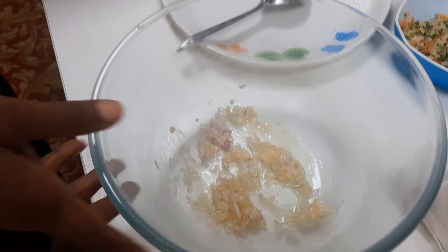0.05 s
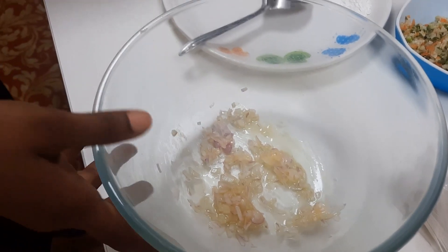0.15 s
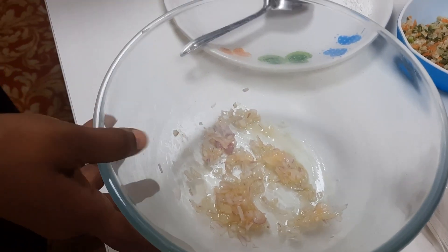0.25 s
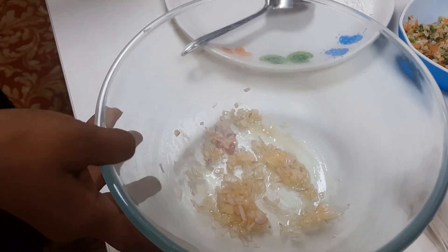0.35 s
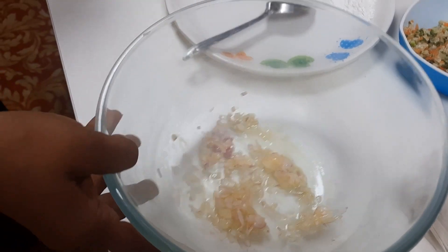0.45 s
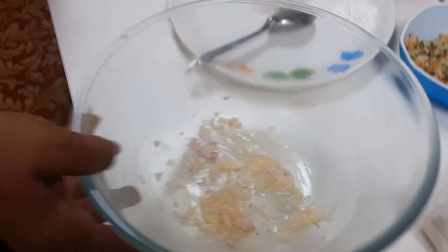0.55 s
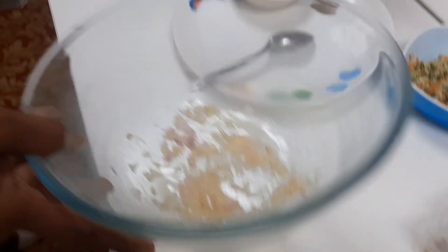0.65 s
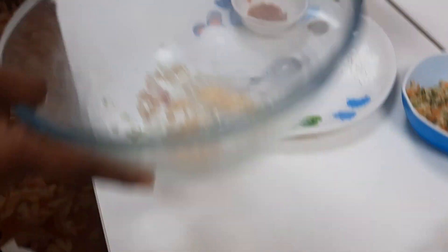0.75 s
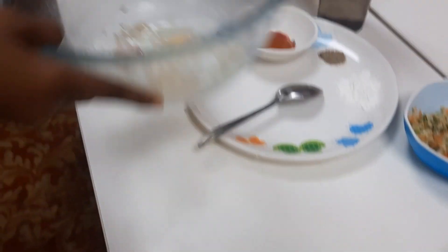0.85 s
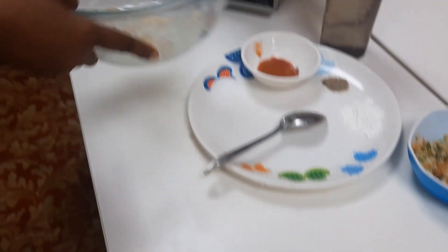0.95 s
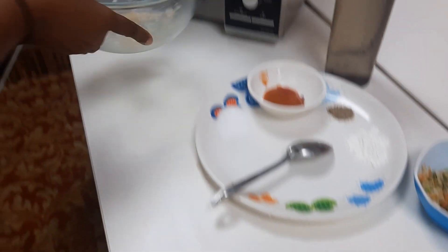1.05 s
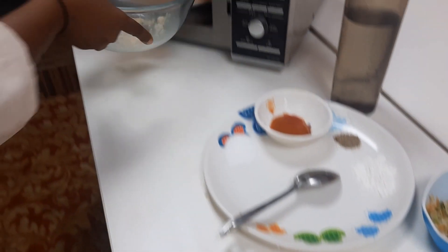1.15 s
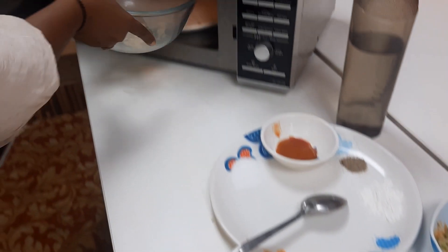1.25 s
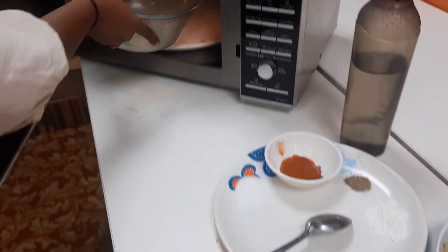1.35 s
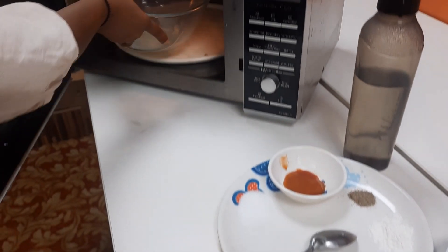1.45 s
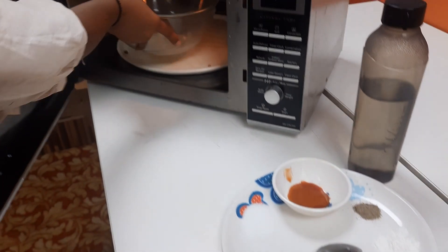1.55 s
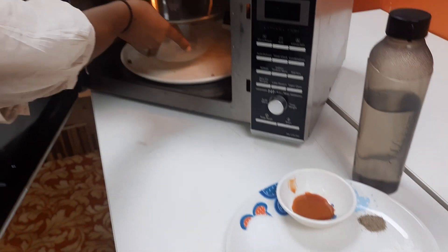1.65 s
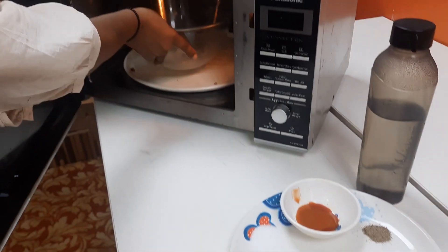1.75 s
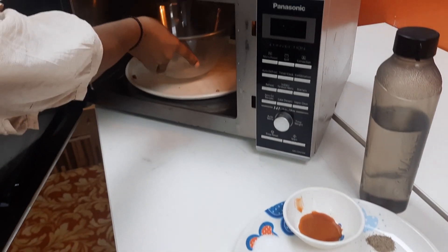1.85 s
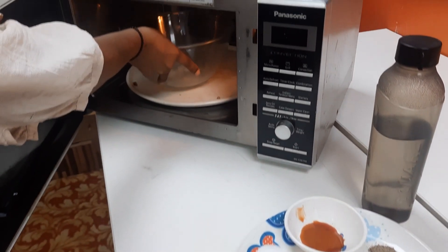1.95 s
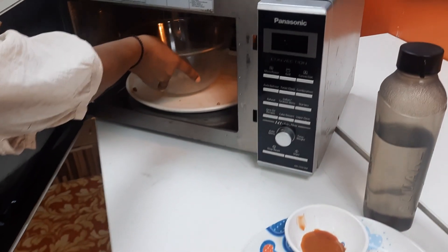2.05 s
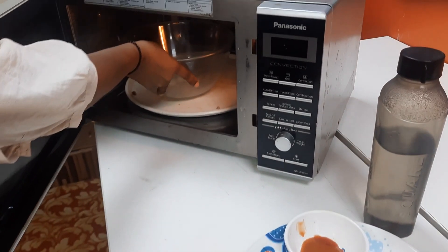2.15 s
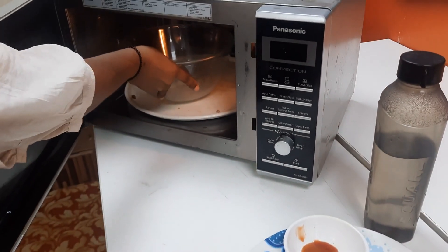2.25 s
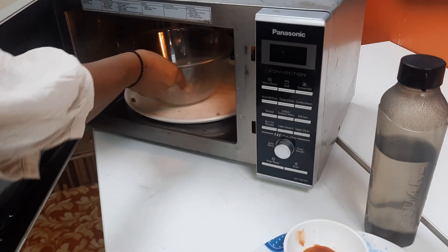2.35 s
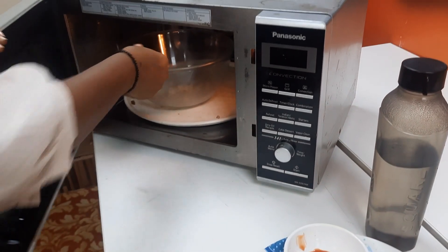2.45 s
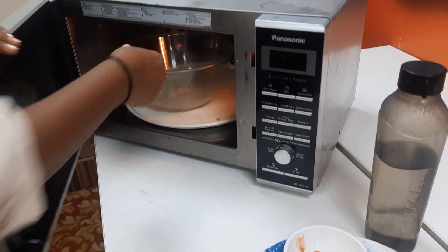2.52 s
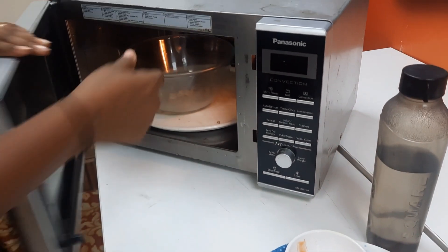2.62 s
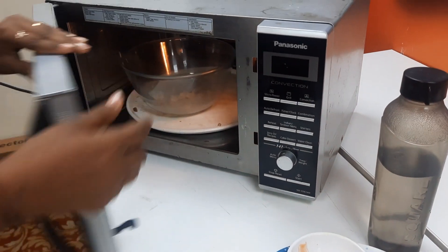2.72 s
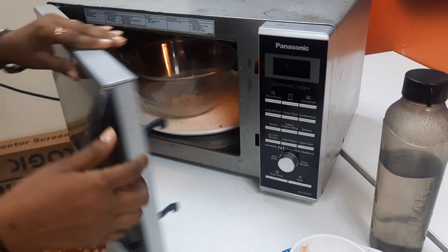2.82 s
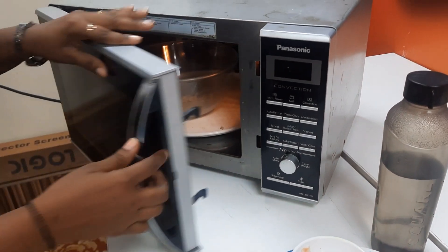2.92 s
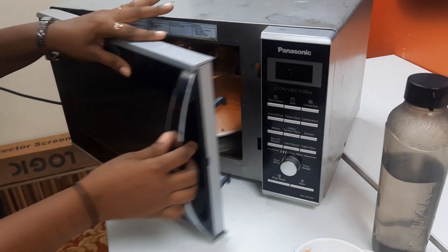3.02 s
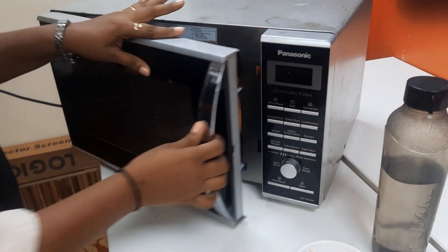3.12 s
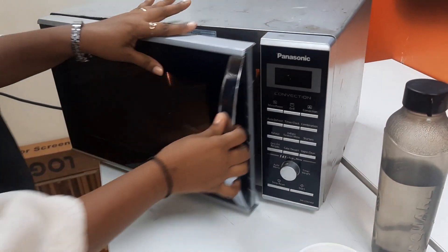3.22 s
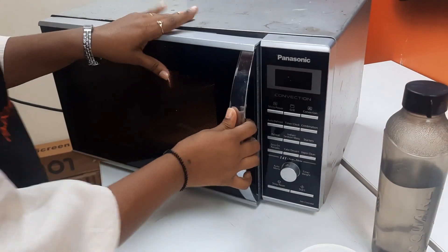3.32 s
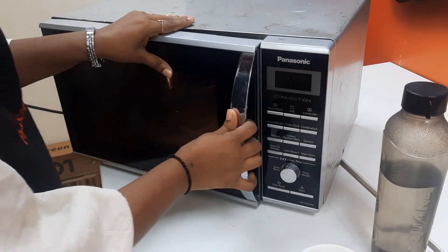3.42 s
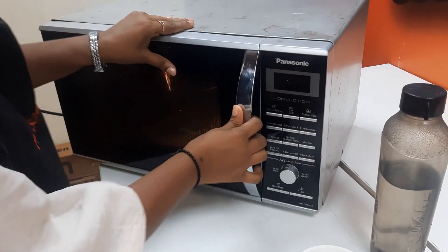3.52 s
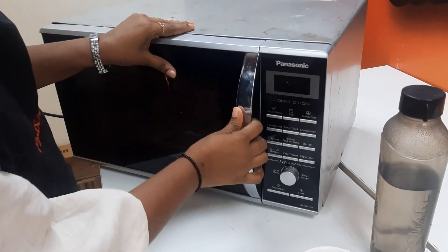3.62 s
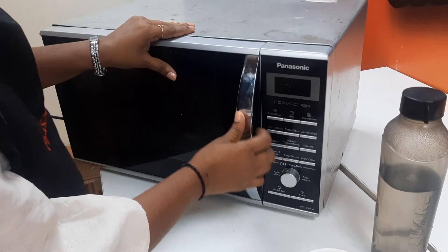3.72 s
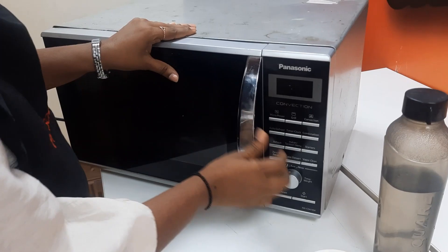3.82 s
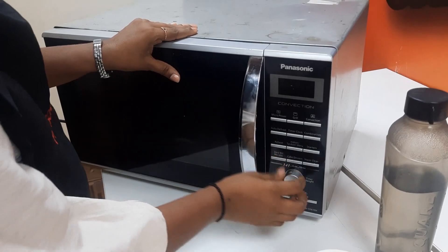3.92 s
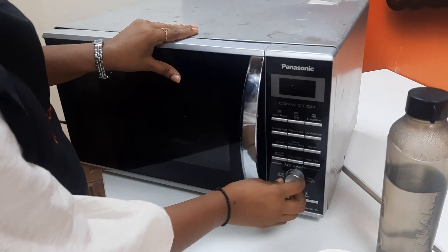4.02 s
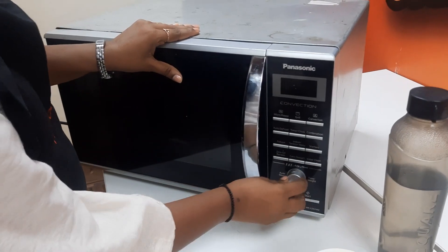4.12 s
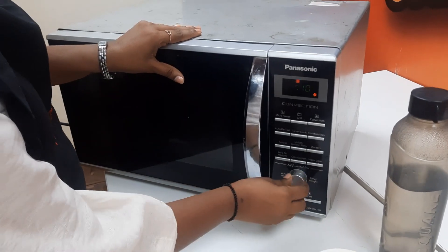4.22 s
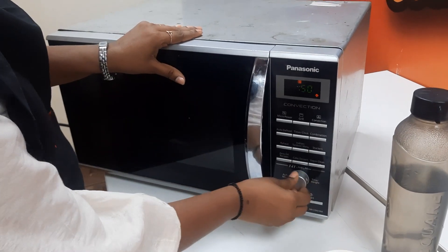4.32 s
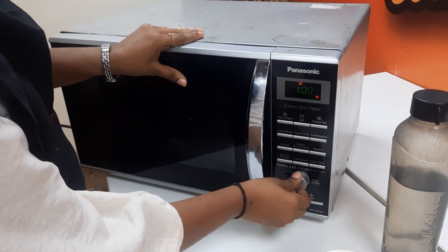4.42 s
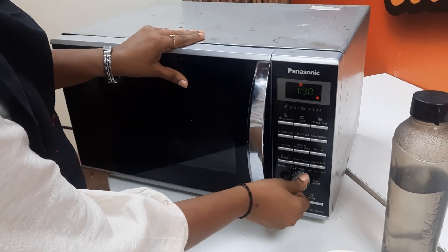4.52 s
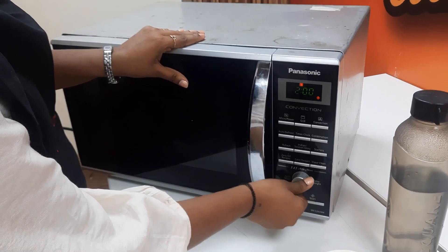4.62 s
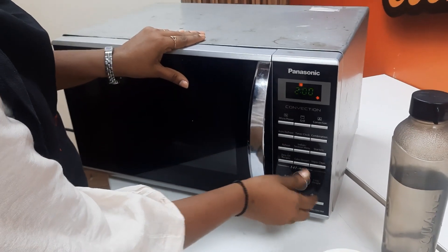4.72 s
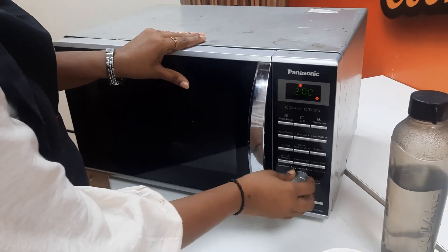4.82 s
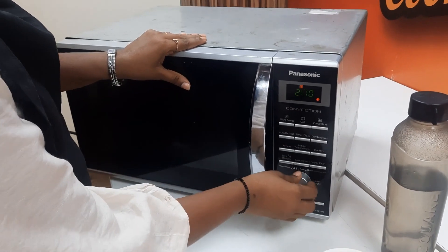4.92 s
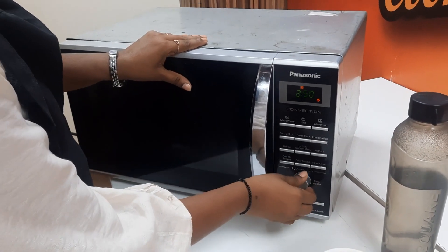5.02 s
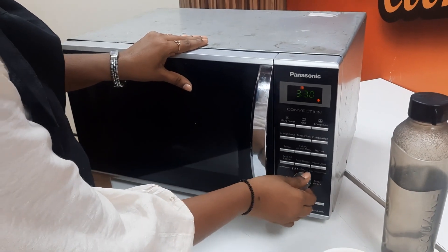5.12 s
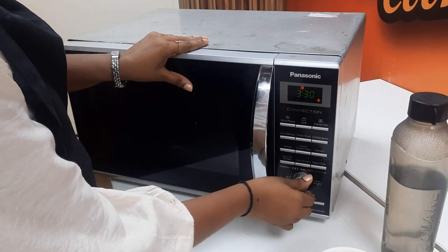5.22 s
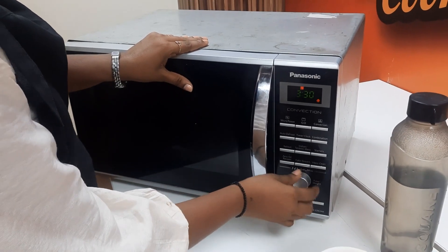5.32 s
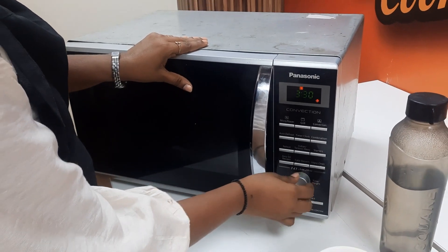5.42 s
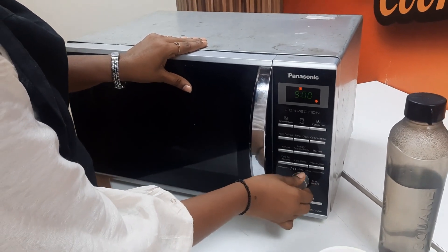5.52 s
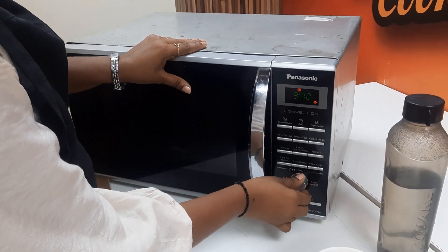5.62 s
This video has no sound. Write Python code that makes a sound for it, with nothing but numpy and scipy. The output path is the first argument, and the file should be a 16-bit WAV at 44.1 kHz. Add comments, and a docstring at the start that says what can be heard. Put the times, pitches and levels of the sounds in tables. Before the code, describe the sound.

A small, hard-walled kitchen, heard close in stereo and leaning slightly left, with a very quiet low mains hum and rumble. In the first 0.15 seconds a glass bowl bumps the counter in a rapid, woody clatter. Soft gritty drags follow, with a hollow tipping knock at 0.56 and small scrapes until 0.9. A faint glassy graze ticks at 1.3. At 2.08 the bowl lands on the oven turntable with a bright clack and ring, then knocks again at 2.17 and rocks to rest, damped by a hand around 2.3. Faint rubbing and ticks lead to the door: a latch click at 3.33, small bounces, then a loud, deep clunk at 3.57 with steel boom and brief rattle. A soft bump comes at 3.8. From 4.3 to 5.55 a plastic dial gives small clusters of dull clicks and scrapes, with a barely audible squeak near 4.8.

```python
"""In a small hard kitchen with a low mains hum, a glass bowl is slid off a counter into a microwave oven.
It lands on the turntable, rings and rocks; the door shuts with a deep clunk and a timer dial clicks round.
Blows are decaying sine waves (rings) or short bursts of coloured noise (cracks); rubbing is uneven noise.
Echoes made from fading noise are added to each source, then two microphones colour the sound."""
import sys
import numpy as np
from scipy import signal
from scipy.fft import rfft, irfft, next_fast_len
from scipy.io import wavfile

SR = 44100
rng = np.random.default_rng(int(sys.argv[2]) if len(sys.argv) > 2 else 0)


def output_pcm(signal):
    """Save a mono or channel-first signal as 16-bit PCM at the path in sys.argv[1].

    Samples are clipped to [-1, 1] before scaling.
    """
    pcm = np.clip(np.atleast_2d(signal).T, -1, 1) * 32767
    wavfile.write(sys.argv[1], SR, np.round(pcm).astype(np.int16))


N = 250047
T = np.arange(N) / SR
AGE = T[:SR]  # time since a blow, up to one second

# In all tables, fade time means the seconds a sound takes to drop by 60 dB.

# Low rumble. Each row: frequency in Hz, level in dB.
RUMBLE_COLOUR = [(15, -51), (25, -22.5), (43, -2.5), (70, -13.5), (102, 1.5), (125, -14), (233, -17),
                 (254, -23.5), (290, -10), (316, -20), (423, -29.5), (590, -35), (800, -45), (1040, -78.5),
                 (1760, -120)]
# Faint air noise. Each row: frequency in Hz, level in dB.
AIR_COLOUR = [(290, -35), (500, -2), (553, -7), (933, -21), (1110, -1.5), (1210, -14.5), (1690, -10),
              (3590, -17.5), (4150, -19), (6700, -16.5), (16000, -25)]
RUMBLE_DB, AIR_DB = -57, -79.5

# Likeness of the two ears. Each row: frequency in Hz, likeness (1 is identical).
EAR_LIKENESS = [(100, 0.87), (300, 0.94), (600, 0.79), (1100, 0.31), (2200, 0.2), (4500, .05), (15000, .05)]
# How long echoes last. Each row: frequency in Hz, fade time in seconds.
ROOM_FADE = [(100, 1), (300, 0.55), (800, 0.38), (2000, 0.32), (6000, 0.33), (14000, 0.46)]
# Tone of the echoes. Each row: frequency in Hz, level in dB.
ROOM_COLOUR = [(60, -5), (150, -12.5), (300, 1.5), (700, 5), (15000, -4.5)]
# Tone of the microphones. Each row: frequency in Hz, level in dB.
MIC_COLOUR = [(40, -6), (150, 3), (500, 1), (2000, 0.5), (8200, 4), (9000, -3), (9600, -7), (10500, 2.5),
              (12000, 5), (15500, 8.5)]
# Louder left side. Each row: frequency in Hz, left over right in dB.
LEFT_LEAD = [(60, 3.5), (150, 2), (600, 2.5), (2200, 4.5), (4500, 1), (8000, 0), (13000, 3)]
EDGE_HZ = 15950  # top of the recorded band

# Light clicks of fingers, glass and hinge. Each row: start in seconds, level in dB, brightness in Hz.
TICKS = [(0.411, -48.5, 8640), (0.901, -55, 6160), (1.301, -40.5, 18000), (1.316, -40, 6000),
         (2.565, -54.5, 8950), (2.615, -48, 10000), (2.987, -48, 4500), (3.187, -51, 6000),
         (3.234, -53, 8000), (3.3, -48.5, 8240)]
# Tone of a light click. Each row: frequency in Hz, level in dB.
TICK_COLOUR = [(180, -38.5), (300, -17.5), (384, -3.5), (509, -27.5), (1050, -12), (2610, -25.5),
               (3020, -21.5), (4210, -20.5), (6150, -21), (7750, -21.5), (9290, -30), (12500, -26),
               (15500, -32.5)]
TICK_FADE_S = 0.068
# Hands press on the counter and the oven. Each row: start in seconds, level in dB.
NUDGES = [(.2, -39), (0.568, -39.5), (.76, -50), (1.052, -50.5), (1.284, -57.5), (1.58, -55.5),
          (2.092, -41), (2.99, -48.5), (5.473, -41), (5.551, -46)]
# Tone of a soft push. Each row: frequency in Hz, level in dB.
PUSH_COLOUR = [(20, -23.5), (45, -4.5), (75, -1), (105, 0.5), (160, -14.5), (260, -18.5), (600, -53),
               (3000, -93)]
# Sleeve and hinge rub as the arm draws back and the door swings.
# Each row: start in seconds, length in seconds, level in dB.
SWEEPS = [(2.45, 0.12, -65), (2.528, 0.11, -62), (2.745, 0.1, -66), (3.005, 0.047, -53), (3.185, 0.35, -54),
          (3.91, 0.07, -54), (4.1, 0.091, -64.5)]
SWEEP_ATTACK_S, SWEEP_SAG_DB_PER_S, SWEEP_RELEASE_S = 0.03, 15.5, 0.3
# Tone of the rub. Each row: frequency in Hz, level in dB.
RUB_COLOUR = [(240, -22), (400, -0.5), (432, -5), (570, -5), (1070, -11.5), (1290, -6.5), (3530, -22.5),
              (6640, -26.5), (9610, -37.5), (11800, -52.5), (16000, -40.5)]

# The timer dial is twisted. Each row: start in seconds, length in seconds, level in dB.
TWISTS = [(4.29, .06, -71), (4.502, 0.13, -60.5), (4.988, 0.1, -57), (5.497, 0.08, -56)]
TWIST_ATTACK_S, TWIST_SAG_DB_PER_S, TWIST_RELEASE_S = 0.006, 38, 0.074
GRIP_LEAD_S, GRIP_DB = 0.073, -22.5  # before each twist the fingers take up the slack, this much softer
# The dial clicks round. Each row: start in seconds, level in dB.
DETENTS = [(4.302, -57), (4.346, -54), (4.477, -58.5), (4.51, -49), (4.59, -50.5), (4.614, -49.5),
           (4.885, -58.5), (4.956, -57), (4.983, -51.5), (5.034, -47.5), (5.423, -60), (5.479, -54.5),
           (5.501, -51.5), (5.551, -48.5)]
DETENT_HZ, DETENT_DB_PER_OCTAVE = 5400, 5  # brightness of the firmest click; softer clicks are duller
# Tone of the dial in its plastic panel. Each row: frequency in Hz, level in dB.
DIAL_COLOUR = [(250, -10), (500, -10), (850, -10), (1200, -1), (1450, -7), (1700, -7), (2000, -5.5),
               (2400, -20.5), (3000, -22), (3700, -22), (4900, -34.5), (7000, -31), (15000, -40.5)]
# The knob catches once and rings. Each row: frequency in Hz, level in dB, fade time in seconds.
CATCH_MODES = [(1610, 1, 0.047), (1800, 0, 0.038), (1950, -9, 0.05)]

# Things bumped on the counter.
# Each row: start in seconds, clatter level in dB, thump level in dB, clatter brightness in Hz.
BUMPS = [(0.01, -28, -45, 16000), (0.034, -16.5, -30, 11900), (0.057, -24, -33, 7000),
         (.079, -20.5, -30.5, 6000), (0.091, -26, -32.5, 7050), (0.141, -32, -28.5, 2700),
         (.2, -46.5, -39.5, 3450), (.562, -34.5, -36.5, 1570), (0.831, -55, -48.5, 9100)]
# Tone of the clatter. Each row: frequency in Hz, level in dB.
CLATTER_COLOUR = [(24, -40.5), (40, -16), (69, 1), (114, -9), (158, -4), (368, -7.5), (496, -13), (577, -8),
                  (740, -13), (1380, -9), (2570, -15), (4570, -15), (7520, -19), (8960, -28), (15500, -24)]
CLATTER_FADE_S = 0.11
# The ringing counter top. Each row: frequency in Hz, level in dB, fade time in seconds.
COUNTER_MODES = [(108.5, -20.5, .3), (161, -2, 0.18), (227.8, -5.5, 0.28), (272.4, -8.5, 0.29),
                 (343, -8.5, .3), (352, -2.5, 0.11), (623, -2, 0.046), (4550, -27.5, 0.17),
                 (4600, -19, 0.16)]
# The bowl tips on its foot as it is lifted.
# Each row: start in seconds, level in dB, pitch in Hz, fade time in seconds.
TIPS = [(.560, -23, 384, 0.086), (.582, -34, 361, 0.14), (0.641, -37, 302, 0.24), (0.763, -41, 276, 0.31),
        (0.834, -42.5, 328, .15)]
# The bowl's foot drags over the counter in short pulls.
# Each row: start in seconds, length in seconds, level in dB.
DRAGS = [(.25, 0.15, -59.5), (.365, 0.052, -53.5), (.41, 0.12, -54.5), (.552, 0.049, -52.5),
         (.716, 0.13, -52), (.828, 0.033, -47), (.897, 0.011, -50.5)]
DRAG_ATTACK_S, DRAG_SAG_DB_PER_S, DRAG_RELEASE_S = 0.00506, 32.5, 0.16  # a pull catches, eases off and stops
# Tone of the dragging. Each row: frequency in Hz, level in dB.
SLIDE_COLOUR = [(240, 5), (400, -1), (964, -11), (1230, -6.5), (1400, -5), (3120, -9.5), (6640, -11.5),
                (7990, -19), (9320, -18.5), (11200, -28.5), (16000, -30)]

# Latch hooks touch, ride up and drop as the door shuts and bounces.
# Each row: start in seconds, latch level in dB, case thud level in dB, latch brightness in Hz.
DOOR_BLOWS = [(2.991, -59, -38.5, 1500), (3.325, -21, -31.5, 11070), (3.352, -27.5, -37, 3085),
              (3.401, -33.5, -40, 1900), (3.437, -33, -33, 2500), (3.495, -35.5, -38, 2480),
              (3.531, -23, -42.5, 8770), (3.552, -22.5, -26.5, 16000), (3.568, -11.5, -10.5, 19000),
              (3.587, -25, -14.5, 12000), (3.61, -32, -23.5, 9000), (3.652, -34.5, -32, 12000),
              (3.812, -45, -32, 6900)]
# Tone of the latch. Each row: frequency in Hz, level in dB.
LATCH_COLOUR = [(88, -42.5), (150, -6), (352, -11), (561, -21), (930, -15), (1540, -19), (1940, -17),
                (2360, -22), (3160, -24), (3620, -26), (6860, -25.5), (9360, -36.5), (14100, -40),
                (15500, -41)]
LATCH_FADE_S = 0.074
# Sheet steel case and door. Each row: frequency in Hz, level in dB, fade time in seconds.
CASE_MODES = [(68.8, -15.5, 1.7), (82.3, -17.5, 0.1), (138.2, -15, 0.87), (159, -2.5, 0.061),
              (171, -12, .12), (206.2, -12.5, 0.047), (242.5, -18.5, 0.92), (275, -18.5, 0.97),
              (323.8, -5, 0.19), (360.2, -10.5, 0.11), (415, -12, 0.12), (481, -12.5, 0.2),
              (593.8, -12, 0.3), (692, -26, 0.42), (857, -16.5, 0.26), (980, -22, 0.098), (2360, -26, .3),
              (3284, -51.5, .8), (3920, -42, 0.77)]
SLAM_S = 3.568  # the door meets the frame
# Loose panels shiver after the slam.
RATTLE_DB, RATTLE_ATTACK_S, RATTLE_RELEASE_S, RATTLE_HZ = -25, 0.02, 0.55, 3400

# The rim grazes the oven, damped by the hand.
# Each row: frequency in Hz, level in dB, fade time in seconds.
GRAZE_MODES = [(382.5, -8.0, 0.13), (883, -3.5, 0.088), (1034, 0.0, 0.081), (1510, -15.5, 0.058),
               (3130, -2.5, 0.057), (4220, 2, 0.053), (5270, 0.5, 0.046)]
# The bowl lands and rocks on the turntable. Each row: start in seconds, glass ring level in dB,
# plate knock level in dB, oven body level in dB, brightness of glass and clack in Hz, clack level in dB.
LANDINGS = [(2.0771, -13, -9, -27, 14400, -18), (2.090, -22, -31, -30.5, 3500, -23),
            (2.125, -33, -30.5, -21, 2500, -25), (2.1711, -21, -9.5, -19, 1480, -32.5),
            (2.228, -34, -23, -29, 3380, -23), (2.25, -35.5, -34.5, -33, 2980, -49),
            (2.273, -29, -23, -24.5, 3580, -20), (2.321, -51, -64, -27.5, 1950, -46)]
# The glass bowl. Each row: frequency in Hz, level in dB, fade time in seconds.
GLASS_MODES = [(1153, -8.5, 0.7), (1282, -11.5, 0.42), (1331, -3.5, 0.062), (1573, -18.5, .14),
               (1726, -7.5, 0.082), (2080, -18.5, 0.75), (2162, -2, 0.2), (2192, 0.5, 0.14),
               (2240, -15, .16), (2323, -21, 0.73), (2590, -15, 0.15), (3100, -14, 0.086),
               (3255, 1.5, 0.09), (3436, -20, 0.13), (3710, -24.5, 0.14), (4100, -23.5, 0.18),
               (4910, -7.5, 0.17), (6060, -26, 0.13), (6020, -21, 0.34), (6970, -16.5, 0.19),
               (6850, -22.5, 0.2), (6960, -21.5, .14), (7440, -28.5, .25), (8260, -24, 0.14),
               (8350, -28.5, 0.17), (9940, -33.5, 0.38), (12060, -31, .19), (12378, -35, .2),
               (13930, -35, 0.18), (14848, -30.5, 0.13)]
# The turntable plate. Each row: frequency in Hz, level in dB, fade time in seconds.
TURNTABLE_MODES = [(563.5, -14, 0.15), (669, -7, 0.12), (713, -2.5, 0.13), (787, -3.5, 0.16),
                   (790, 1, 0.11), (851, -11.5, 0.12)]
# The oven floor and the cavity under it. Each row: frequency in Hz, level in dB, fade time in seconds.
CAVITY_MODES = [(211.2, -13.5, 0.41), (243, -11.5, .28), (299.3, -7.5, 0.33), (328, 2, 0.17),
                (379, -13.5, .18), (415, -11.5, 0.11), (455.5, -10.5, 0.28), (534, -16.5, 0.063)]
# Tone of the landing clack. Each row: frequency in Hz, level in dB.
CLACK_COLOUR = [(100, -29), (230, -16.5), (480, -8.5), (740, -13.5), (1000, -11.5), (1300, -18.5),
                (1800, -16), (2300, -15.5), (2800, -27.5), (3300, -21), (4300, -29), (7500, -23),
                (9500, -47), (15000, -42)]
CHATTER_COUNT, CHATTER_GAP_S, CHATTER_DB = 3, 0.006, -12  # bounces, mean gap, step from bounce to bounce
HAND_S, HAND_DAMP_DB_PER_S = 2.302, 126  # from this time the hand steadies the bowl and damps its ring


def amp(db):
    """Turns decibels into a gain."""
    return 10 ** (np.asarray(db) / 20)


def evened(x):
    """Scales a sound to an average (rms) level of 1."""
    return x / np.sqrt(np.mean(x ** 2) + 1e-20)


def read(points, hz):
    """Reads a table between its rows, on a log-frequency axis."""
    f, value = np.transpose(points)
    return np.interp(np.log(hz + 1), np.log(f + 1), value)


def add(mix, s, sound):
    """Lays a sound into the mix at time s."""
    part = mix[:, max(round(s * SR), 0):][:, :sound.shape[-1]]
    part += sound[..., :part.shape[1]]


def coloured(x, spectrum):
    """Gives two unrelated signals a tone; the bass is alike in both ears, the treble is not."""
    hz = np.fft.rfftfreq(x.shape[1], 1 / SR)
    left, other = rfft(x)
    same = np.clip(read(EAR_LIKENESS, hz), -1, 1)
    right = same * left + np.sqrt(1 - same ** 2) * other
    return evened(irfft(np.array([left, right]) * amp(read(spectrum, hz)), x.shape[1]))


def soften(x, hz):
    """A softer contact excites less treble, so a low-pass filter removes it."""
    low_pass = signal.butter(2, min(hz, 0.45 * SR), fs=SR, output="sos")
    return signal.sosfilt(low_pass, x)


def crack(spectrum, t60, rise):
    """The dense, quickly dying resonances of one blow, made from a burst of noise."""
    t = AGE[:next_fast_len(min(int(SR * t60) + 256, SR // 2))]
    noise = coloured(rng.standard_normal((2, len(t))), spectrum)
    burst = noise * amp(-60 * t / t60) * (1 - np.exp(-t / rise))
    end_fade = np.minimum(1, 5 * (1 - t / t[-1]))
    return np.pad(burst * end_fade, [(0, 0), (0, SR - len(t))])


def ring(modes, rise, uneven_db, split):
    """Each struck mode is a close pair of tones that beats; every blow shares out the levels anew."""
    out = np.zeros((2, SR))
    for k, (hz, db, t60) in enumerate(modes):
        t = AGE[:int(SR * t60)]
        share, skew, detune = rng.standard_normal(3)
        # high modes reach the two ears out of step
        angle = np.arccos(np.clip(read(EAR_LIKENESS, hz), -1, 1)) * np.sign(skew)
        ears = np.exp(1j * angle * np.array([[0.5], [-0.5]]))
        first = 0.59 * np.exp(2j * np.pi * hz * t)
        second = 0.3 * np.exp(2j * np.pi * hz * (1 + split * detune) * t)
        level = amp(db + uneven_db * share - 60 * t / t60)
        out[:, :len(t)] += (-1) ** k * (level * (first + second) * ears).imag
    end_fade = np.sqrt(1 - AGE)
    return out * (1 - np.exp(-AGE / rise)) * end_fade


def throb(hz, sag, length):
    """A plate flexes for a few cycles in contact; its pitch starts high and sinks towards hz."""
    t = np.arange(0, length, 1 / SR)
    pitch = hz * (1 + sag * np.exp(-t / 0.0052))
    return np.sin(2 * np.pi * np.cumsum(pitch) / SR) * signal.windows.tukey(len(t), 0.5)


def chatter(sound):
    """A hard contact bounces a few times at uneven gaps, each bounce weaker."""
    out = sound.copy()
    gaps = CHATTER_GAP_S * (0.5 + rng.random(CHATTER_COUNT))
    for k, s in enumerate(np.cumsum(gaps)):
        add(out, s, amp(CHATTER_DB * (k + 1.5)) * sound)
    return out


def friction(spectrum, slips_per_s, spread_db, smooth, slip_t60):
    """Rubbing: tiny slips of uneven size, each a short burst, over a smooth hiss."""
    sizes = amp(spread_db * np.minimum(rng.exponential(1, N), 3))
    slips = (rng.random(N) < slips_per_s / SR) * sizes
    bursts = signal.oaconvolve(slips, amp(-60 * AGE[:4000] / slip_t60))[:N]
    return coloured(rng.standard_normal((2, N)) * (evened(bursts) + smooth), spectrum)


def strokes(rows, attack_s, sag_db_per_s, release_s):
    """Rubbing pressure: each stroke swells, sags, then drops a further 60 dB over the release."""
    out = np.zeros(N)
    for s, length, db in rows:
        age = np.maximum(T - s, 0)
        released = np.maximum(age - length, 0)
        out += np.minimum(age / attack_s, 1) * amp(db - sag_db_per_s * age - 60 * released / release_s)
    return out


def background():
    """A wavering 100 Hz mains hum, with rumble and air made from coloured noise."""
    waver = evened(signal.resample(rng.standard_normal(40), N))
    hum = amp(-61 + 0.68 * waver) * np.sin(2 * np.pi * 100 * T + 1.4 * waver)
    rumble = amp(RUMBLE_DB) * coloured(rng.standard_normal((2, N)), RUMBLE_COLOUR)
    air = amp(AIR_DB) * coloured(rng.standard_normal((2, N)), AIR_COLOUR)
    return hum + rumble + air


def kitchen(x, wet_db):
    """Adds dense reflections from hard walls, each band dying at its own speed."""
    noise = coloured(rng.standard_normal((2, SR)), ROOM_COLOUR)
    hz, t, z = signal.stft(noise, SR, nperseg=256)
    fading = z * amp(-60 * t / read(ROOM_FADE, hz)[:, None])
    tail = signal.istft(fading, SR, nperseg=256)[1][:, :SR]
    tail = tail * (1 - np.exp(-(AGE / 0.006) ** 2))  # echoes build up over a few milliseconds
    echoes = signal.fftconvolve(x, tail / np.linalg.norm(tail[0]), axes=1)[:, :N]
    return x + amp(wet_db) * echoes


def hands():
    """Sleeve and hinge rub as uneven noise; clicks and soft pushes are short noise bursts."""
    rub = strokes(SWEEPS, SWEEP_ATTACK_S, SWEEP_SAG_DB_PER_S, SWEEP_RELEASE_S)
    out = rub * friction(RUB_COLOUR, slips_per_s=190, spread_db=3.5, smooth=0.94, slip_t60=0.014)
    for s, db, hz in TICKS:
        add(out, s, amp(db) * soften(crack(TICK_COLOUR, TICK_FADE_S, rise=0.00027), hz))
    for s, db in NUDGES:
        add(out, s, amp(db) * crack(PUSH_COLOUR, t60=0.65, rise=0.018))
    return out


def dial():
    """The gripped knob scrapes and clicks in its hollow panel, with one faint squeak between twists."""
    grips = [(s - GRIP_LEAD_S, GRIP_LEAD_S, db + GRIP_DB) for s, _, db in TWISTS]
    turning = strokes(list(TWISTS) + grips, TWIST_ATTACK_S, TWIST_SAG_DB_PER_S, TWIST_RELEASE_S)
    out = turning * friction(DIAL_COLOUR, slips_per_s=170, spread_db=3.5, smooth=0.55, slip_t60=0.016)
    firmest_db = max(db for _, db in DETENTS)
    for s, db in DETENTS:
        panel = crack(DIAL_COLOUR, t60=0.069, rise=0.00062)
        snap = amp(-7.0) * crack(TICK_COLOUR, t60=0.033, rise=0.00024)
        brightness = DETENT_HZ * 2 ** ((db - firmest_db) / DETENT_DB_PER_OCTAVE)
        add(out, s, amp(db) * soften(panel + snap, brightness))
    add(out, 4.984, amp(-43) * ring(CATCH_MODES, rise=0.00091, uneven_db=-2.5, split=0.017))
    squeak_hz = np.linspace(620, 575, round(0.17 * SR))
    squeak = np.sin(2 * np.pi * np.cumsum(squeak_hz) / SR) * np.hanning(len(squeak_hz))
    add(out, 4.76, amp(-69) * squeak)
    return out


def counter():
    """The bowl is bumped, dragged, tipped and lifted: blows clatter and ring, and the foot rubs."""
    pull = strokes(DRAGS, DRAG_ATTACK_S, DRAG_SAG_DB_PER_S, DRAG_RELEASE_S)
    out = pull * friction(SLIDE_COLOUR, slips_per_s=250, spread_db=11.5, smooth=0.94, slip_t60=0.048)
    for s, db, thump_db, hz in BUMPS:
        thump = amp(thump_db) * ring(COUNTER_MODES, rise=0.00091, uneven_db=2.5, split=0.048)
        clatter = amp(db) * soften(crack(CLATTER_COLOUR, CLATTER_FADE_S, rise=0.004), hz)
        add(out, s, clatter + thump)
    for s, db, hz, t60 in TIPS:
        foot = [(hz, 0, t60), (hz * 1.3, -5, t60 * 0.33), (hz * 2.6, -17, t60)]
        add(out, s, amp(db) * ring(foot, rise=0.0014, uneven_db=-0.5, split=0.08))
    return out


def door():
    """Plastic latch hooks snap while the steel case booms and rattles and the oven jolts on its feet."""
    shiver = strokes([(SLAM_S, 0, RATTLE_DB)], RATTLE_ATTACK_S, 0, RATTLE_RELEASE_S)
    rattle = shiver * friction(LATCH_COLOUR, slips_per_s=200, spread_db=0, smooth=0.41, slip_t60=0.025)
    out = soften(rattle, RATTLE_HZ)
    for s, latch_db, thud_db, hz in DOOR_BLOWS:
        latch = amp(latch_db) * soften(crack(LATCH_COLOUR, LATCH_FADE_S, rise=0.0015), hz)
        thud = amp(thud_db) * ring(CASE_MODES, rise=0.0026, uneven_db=1.5, split=0.026)
        add(out, s, latch + thud)
    add(out, 3.43, amp(-35.5) * throb(hz=150, sag=0.79, length=0.07))  # the door flexes as the hooks ride up
    add(out, 3.566, amp(-11.5) * throb(hz=146.5, sag=0.3, length=0.032))  # the deep clunk
    add(out, SLAM_S, amp(-33.0) * crack(PUSH_COLOUR, t60=0.76, rise=0.0028))  # the oven jolts
    return out


def bowl():
    """The rim grazes the oven; then glass meets the turntable: both ring, and the bowl rocks to rest."""
    out = np.zeros((2, N))
    add(out, 1.2995, amp(-39.5) * ring(GRAZE_MODES, rise=0.0006, uneven_db=0.5, split=0.03))
    for s, glass_db, knock_db, body_db, hz, clack_db in LANDINGS:
        glass = amp(glass_db) * ring(GLASS_MODES, rise=0.0022, uneven_db=2.5, split=0.01)
        held_s = np.maximum(s + AGE - HAND_S, 0)
        glass = chatter(glass) * amp(-HAND_DAMP_DB_PER_S * held_s)
        clack = amp(clack_db) * crack(CLACK_COLOUR, t60=0.14, rise=0.0065)
        knock = amp(knock_db) * ring(TURNTABLE_MODES, rise=0.0018, uneven_db=0.0, split=0.015)
        body = amp(body_db) * ring(CAVITY_MODES, rise=0.005, uneven_db=1.5, split=0.04)
        add(out, s, soften(glass + clack, hz) + knock + body)
        add(out, s, amp(knock_db - 6.5) * throb(hz=723.3, sag=0.098, length=0.018))
    return out


def scene():
    """Mixes the sources, each with its own share of the room."""
    on_counter = kitchen(counter(), wet_db=-5.5)
    by_hand = kitchen(hands() + dial(), wet_db=-4.0)
    shutting = kitchen(door(), wet_db=-5.5)
    landing = kitchen(bowl(), wet_db=-11.0)
    return background() + on_counter + by_hand + shutting + landing


def record(dry):
    """Close microphones share the bass, notch the treble, favour the left, overload softly and limit the band."""
    hz = np.fft.rfftfreq(N + SR, 1 / SR)
    z = rfft(dry, N + SR)
    middle = z.mean(0)
    z = middle + (z - middle) * hz / np.hypot(hz, 110)  # left and right merge in the bass
    colour = amp(read(MIC_COLOUR, hz) + np.array([[0.5], [-0.5]]) * read(LEFT_LEAD, hz))
    heard = irfft(z * colour, N + SR)[:, :N]
    heard = heard / (1 + (heard / 0.93) ** 8) ** (1 / 8)  # soft overload: peaks stay below 0.93
    band_limit = signal.firwin(511, EDGE_HZ, window=("kaiser", 9), fs=SR)
    return signal.oaconvolve(heard, band_limit[None], "same")


dry = scene()
out = record(dry)
output_pcm(out)
```